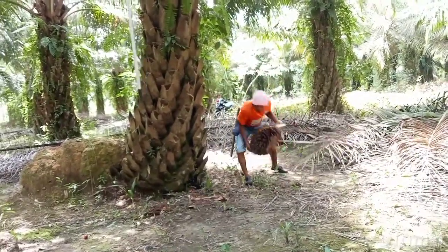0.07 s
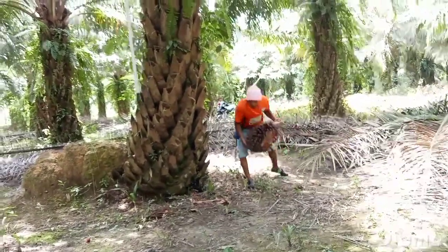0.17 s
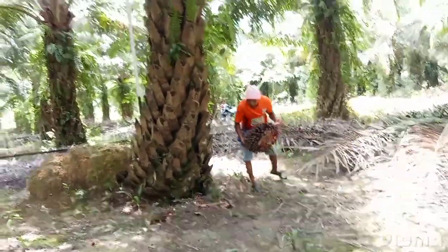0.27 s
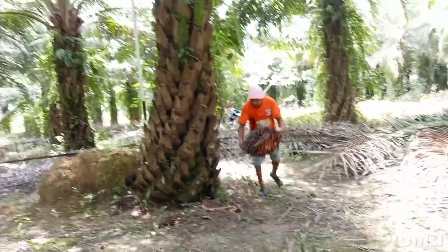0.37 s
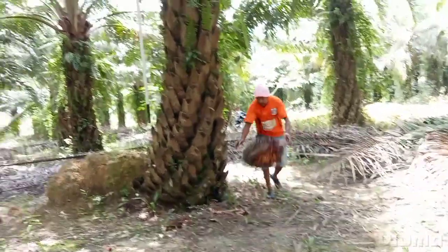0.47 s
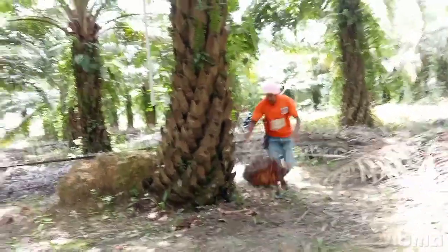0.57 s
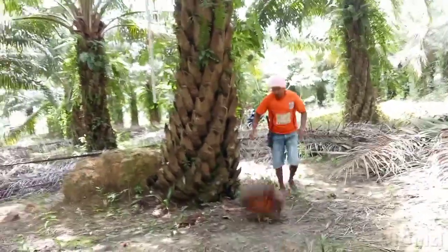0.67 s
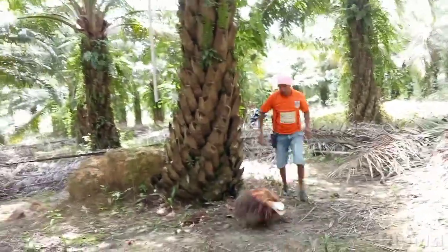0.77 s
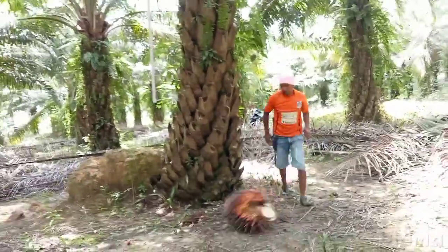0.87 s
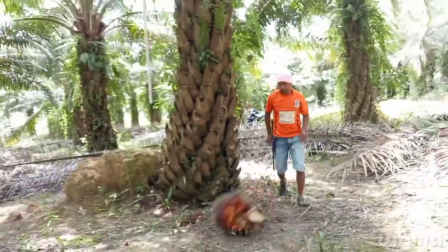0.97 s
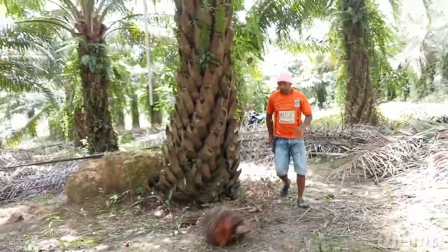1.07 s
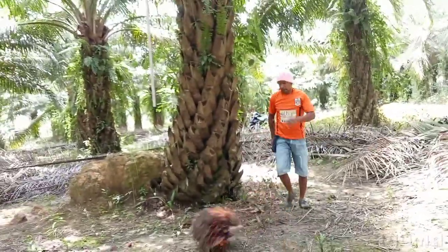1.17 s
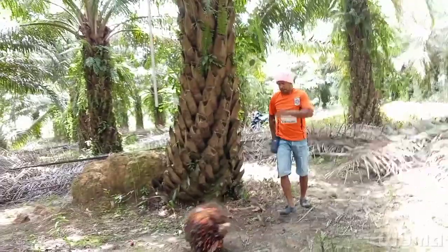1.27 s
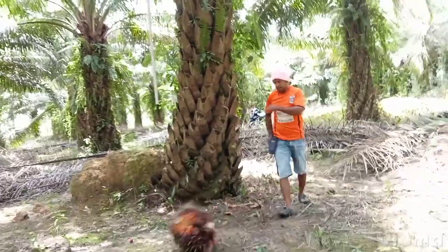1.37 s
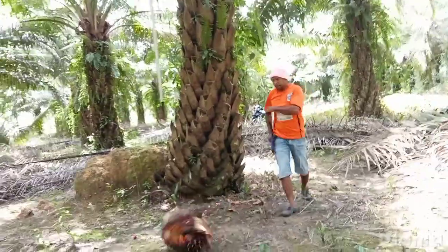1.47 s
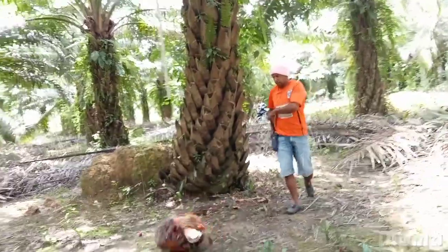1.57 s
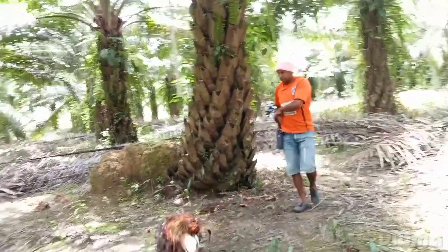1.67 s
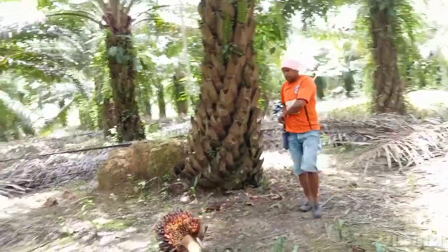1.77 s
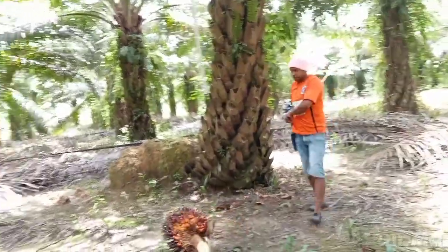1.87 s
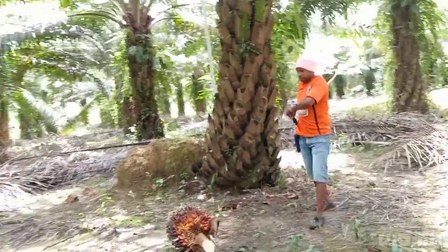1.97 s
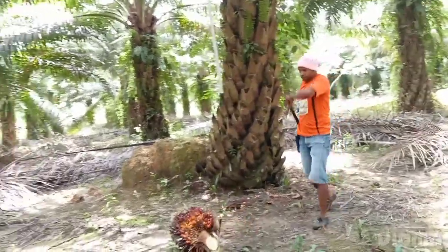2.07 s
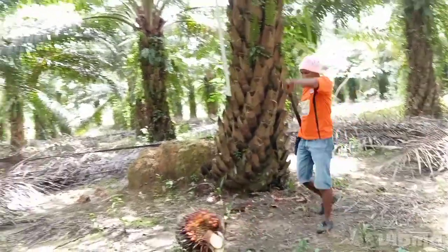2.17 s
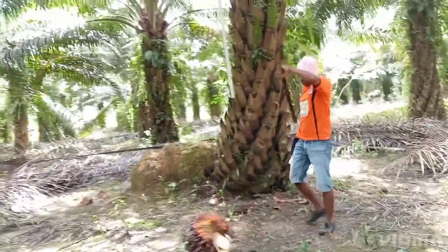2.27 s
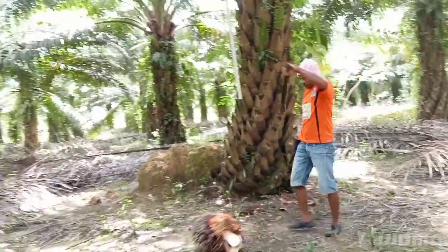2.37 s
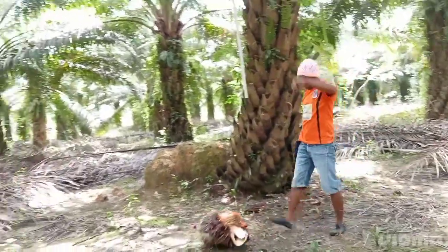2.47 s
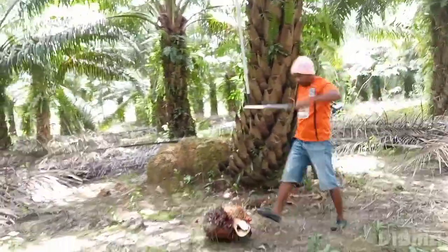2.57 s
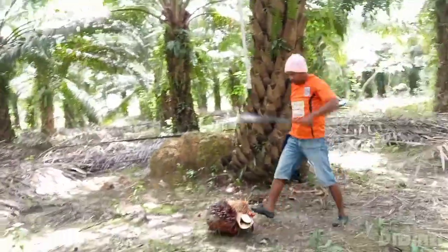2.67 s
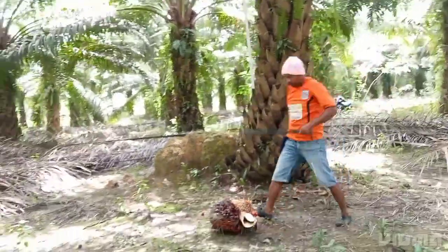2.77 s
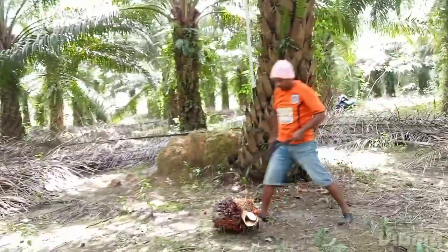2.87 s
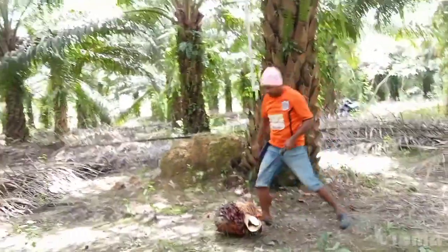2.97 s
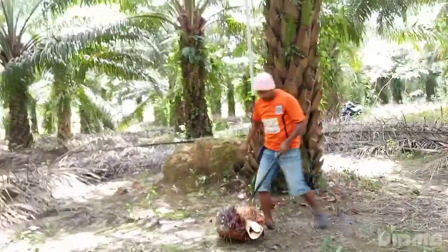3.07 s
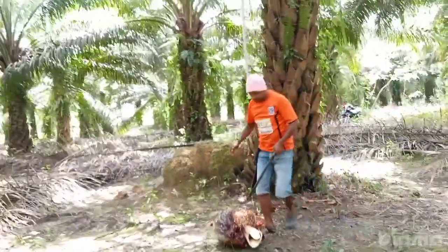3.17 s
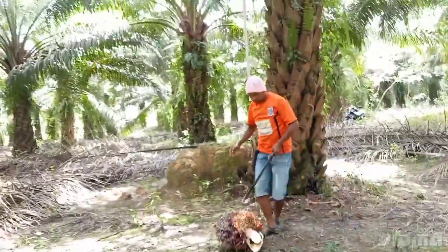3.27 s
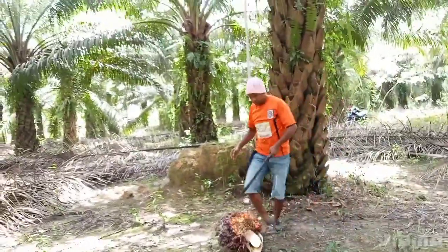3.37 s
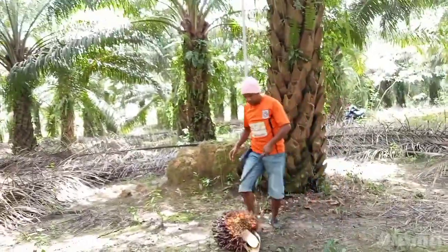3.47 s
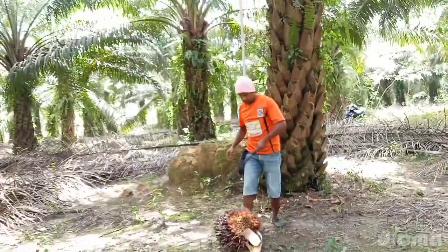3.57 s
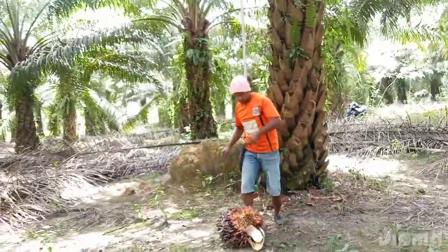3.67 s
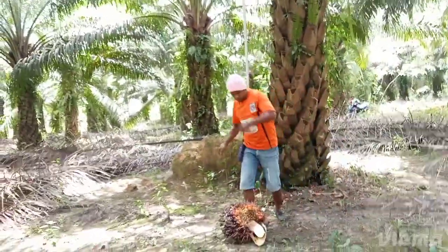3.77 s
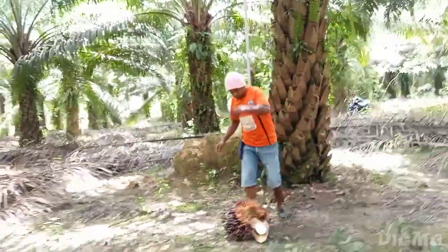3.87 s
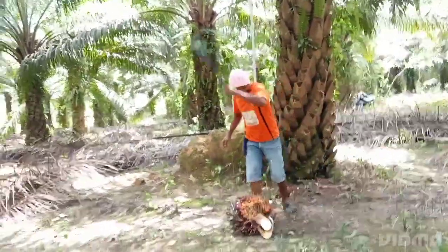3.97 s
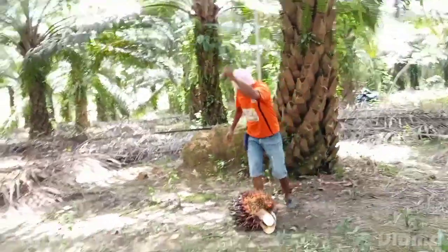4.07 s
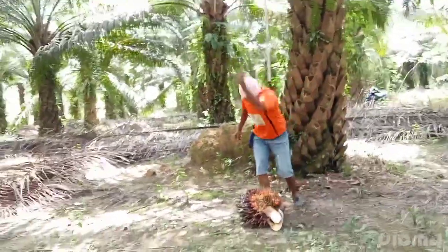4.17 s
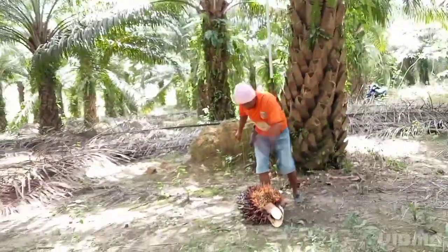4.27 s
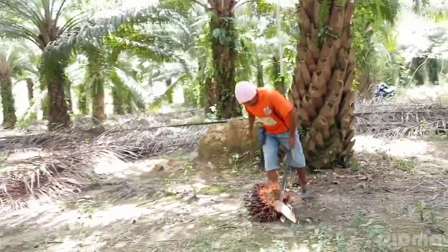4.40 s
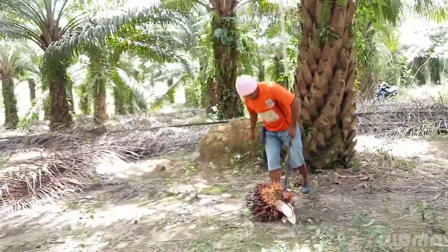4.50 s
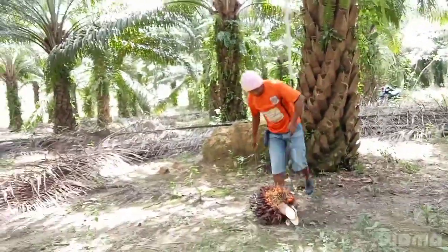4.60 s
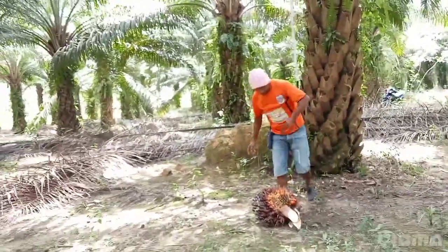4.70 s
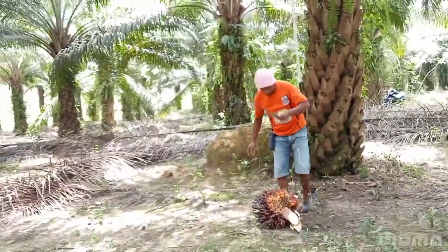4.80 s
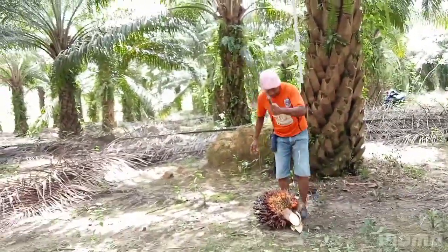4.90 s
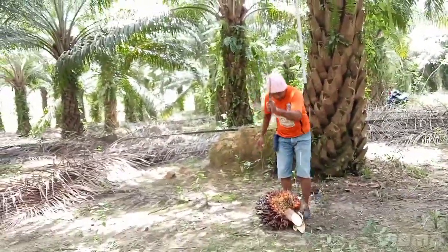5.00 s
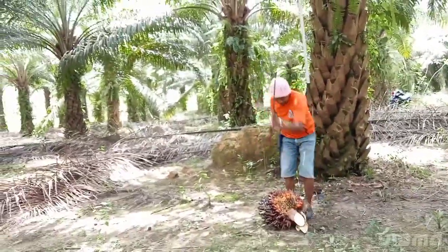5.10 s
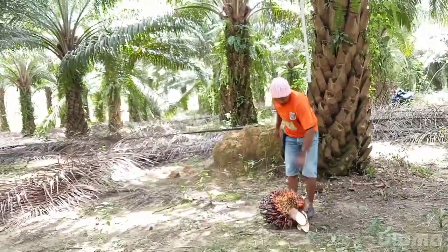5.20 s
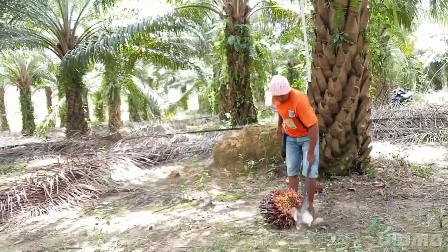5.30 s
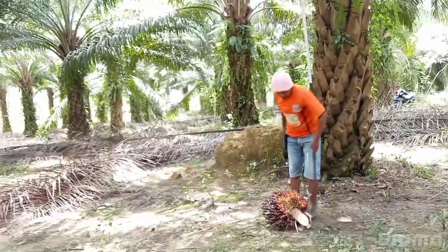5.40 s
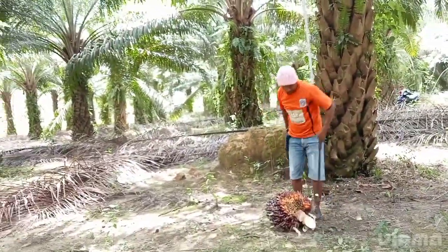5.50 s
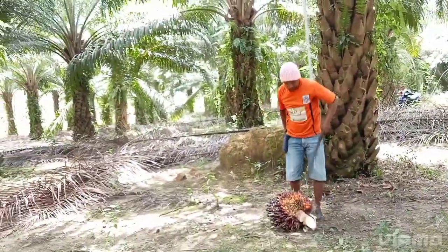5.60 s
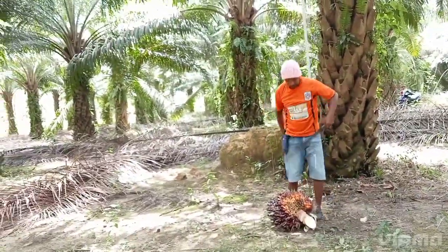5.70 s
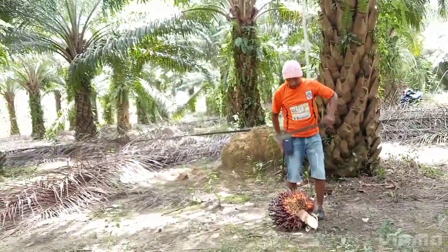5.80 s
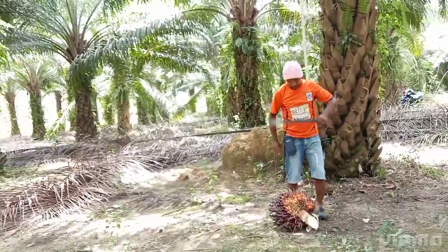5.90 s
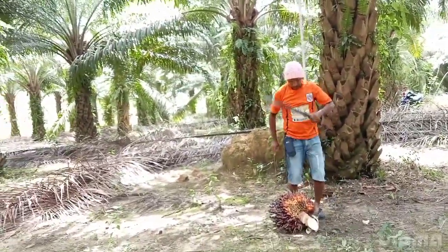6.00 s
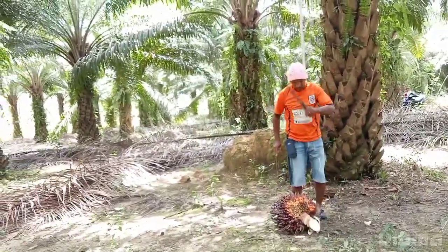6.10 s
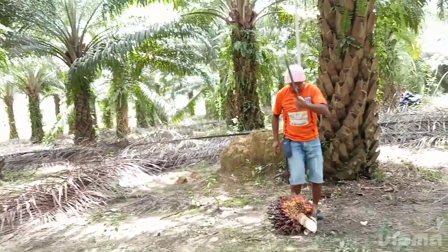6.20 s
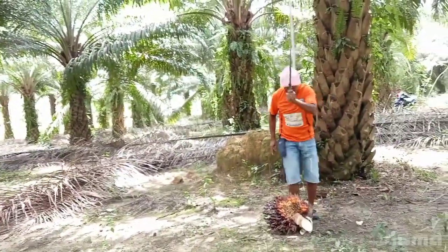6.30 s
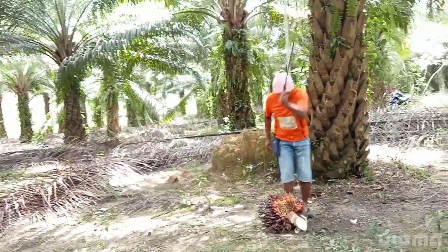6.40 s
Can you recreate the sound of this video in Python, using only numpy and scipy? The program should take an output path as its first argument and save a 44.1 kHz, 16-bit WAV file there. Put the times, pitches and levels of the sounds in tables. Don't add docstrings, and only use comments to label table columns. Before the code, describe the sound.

Outdoors among trunks, steady insect buzz, dry litter scuffs, a crunching thud, a blade scraping free, hard taps, then two sharp echoing chops.

```python
import sys
import numpy as np
from scipy import signal
from scipy.fft import rfft, irfft
from scipy.io import wavfile

SR = 44100
rng = np.random.default_rng(int(sys.argv[2]) if len(sys.argv) > 2 else 0)


def field_ratio(decibels):
    return 10 ** (np.asarray(decibels, dtype=float) / 20)


def dump(signal):
    limited = np.clip(np.atleast_2d(signal).T, -1, 1)
    pcm = np.round(limited * 32767).astype(np.int16)
    wavfile.write(sys.argv[1], SR, pcm)


N = 284427

# start in
# seconds, peak level in dB, pitch in Hz, 60 dB decay time in seconds.
BUMPS = [(1.028, -42.5, 620, 0.052), (1.238, -38, 601, 0.063), (1.28, -46.5, 638, 0.12),
         (1.353, -45.5, 558, 0.061), (1.499, -53, 610, 0.1), (1.57, -54, 590, 0.056),
         (1.724, -47.5, 542, 0.054), (1.879, -51.5, 576, 0.058), (2.02, -44, 644, 0.026),
         (2.335, -52, 637, 0.24), (2.393, -46, 744, 0.093), (3.028, -55.5, 619, 0.079),
         (3.301, -54, 686, 0.042), (3.337, -55, 630, 0.063), (3.384, -48.5, 637, 0.037),
         (3.476, -44.5, 614, 0.033), (3.707, -55, 783, 0.062), (4.328, -66, 583, 0.043),
         (4.38, -55.5, 764, 0.026), (4.471, -44, 610, 0.026), (4.49, -39, 250, 0.038),
         (4.626, -45.5, 294, 0.06), (5.045, -48, 570, 0.028), (5.07, -57, 770, 0.033),
         (5.4455, -20.5, 650, 0.033), (5.95, -62, 626, 0.056), (6.12, -52, 600, 0.026)]
CHOP_TIMES = [4.5084, 5.4270]


def rms_one(x):
    return x / np.sqrt(np.mean(x ** 2) + 1e-20)


def in_time(rows):
    seconds, *columns = np.transpose(rows)
    return [np.interp(np.arange(N) / SR, seconds, column) for column in columns]


def drift(rate):
    r = np.exp(-80 * np.pi * rate / SR)
    white = rng.standard_normal(N // 40 + 2002)
    slow = signal.lfilter([1], [1, -2 * r, r * r], white)[2000:]
    return np.interp(np.arange(N) / 40, np.arange(len(slow)), rms_one(slow))


def colour(x, spectrum):
    hz, db = np.transpose(spectrum)
    grid = np.linspace(1, SR / 2, 2049)
    cepstrum = irfft(np.log(field_ratio(np.interp(np.log(grid), np.log(hz), db))))
    cepstrum[1:2048] *= 2
    cepstrum[2049:] = 0
    response = irfft(np.exp(rfft(cepstrum)))
    return signal.oaconvolve(x, response / np.linalg.norm(response))[:len(x)]


def band(x, low_hz, high_hz):
    edges_hz = [low_hz, min(high_hz, .45 * SR)]
    return signal.sosfilt(signal.butter(2, edges_hz, "band", fs=SR, output="sos"), x)


def grains(per_s, spread_db):
    sizes = field_ratio(spread_db * np.minimum(rng.exponential(1, N), 4)) * rng.choice([-1, 1], N)
    return rms_one(sizes * (rng.random(N) < per_s / SR))


def add(out, s, sound):
    i = round(s * SR)
    out[i:i + len(sound)] += sound[:N - i]


def mode(hz, db, t60, soft_s):
    t = np.arange(int(1.4 * t60 * SR) + 2) / SR
    return field_ratio(db - 60 * t / t60) * (1 - np.exp(-t / soft_s)) * np.sin(2 * np.pi * hz * t)


def burst(length_s, tail_s, per_s):
    t = np.arange(int(.12 * SR)) / SR
    tearing = rng.standard_normal(len(t)) * (0.54 + (rng.random(len(t)) < per_s / SR))
    fade = np.exp(-np.maximum(t - length_s, 0) / tail_s)
    return rms_one(tearing) * fade * np.minimum(t / 0.0002, 1)


def swell(length_s):
    t = np.arange(int(3 * length_s * SR)) / SR / length_s
    return np.minimum(5 * t, 1) * np.exp(-t ** 2 * 2.74)


def chorus(song, body_hz, waver, level_db, per_s, share, click_s, depth_db):
    turn = np.cumsum(per_s * (1 + .001 * drift(1.5))) / SR
    click = np.exp(-(turn % 1) / per_s / click_s)
    throb = field_ratio(depth_db * np.cos(2 * np.pi * np.floor(turn) / 4 + .6))
    pitch = body_hz * (1 + waver * drift(120.0))
    body = np.cos(2 * np.pi * np.cumsum(pitch) / SR)
    soloist = rms_one(colour(click * throb * body, song))
    crowd = colour(rng.standard_normal(N) * field_ratio(0.73 * drift(8.2)), song)
    return field_ratio(level_db) * (np.sqrt(share) * soloist + np.sqrt(1 - share) * crowd)


def insects():
    # time in seconds, level of the low chorus in dB.
    loudness = [(0, -47.5), (1.52, -50), (2.8, -48), (4.3, -47), (5.4, -47), (6.45, -46.5)]
    # time in seconds, low clicks per second, low power share from 0 to 1,
    # high clicks per second, high power share from 0 to 1.
    soloists = [(0, 79, .08, 111, .1), (2.3, 79, .12, 111.3, .2), (3.8, 81.3, .25, 111.5, .4),
                (5, 77, .3, 111.7, .52), (6.45, 76, .3, 112.1, .5)]
    # frequency in Hz, density in dB per Hz.
    low_song = [(3290, -92), (5600, -70), (6310, -13), (6750, -5.5), (6870, 0), (7160, 6), (7660, 4.5),
                (8000, -2), (8260, -21), (8440, -19), (8880, -32), (9800, -44), (12700, -65), (21600, -120)]
    high_song = [(7060, -50), (12150, -62), (12750, -16), (13200, -11), (13850, -10), (14300, -2),
                 (14900, 1), (15500, 2), (16000, -27)]
    low_db, = in_time(loudness)
    low_per_s, low_share, high_per_s, high_share = in_time(soloists)
    high_db = low_db.mean() - 17 + 1.3 * (low_db - low_db.mean())
    low = chorus(low_song, 7170, .012, low_db, low_per_s, low_share, click_s=.004, depth_db=6.5)
    high = chorus(high_song, 14900, .03, high_db, high_per_s, high_share, click_s=.002, depth_db=3.5)
    return low + high


def overtone_puffs():
    pitch_hz, per_s, stops_s = 14150, 19.3, 1.9
    t = np.arange(N) / SR
    beat = np.maximum(np.sin(2 * np.pi * per_s * t), 0) * np.clip((stops_s - t) / .4, 0, 1)
    return field_ratio(-71) * beat * rms_one(band(rng.standard_normal(N), pitch_hz - 130, pitch_hz + 130))


def engine():
    # time in seconds, firings per second.
    speed = [(0, 15.22), (5.6, 15.2), (5.89, 14.8), (6.09, 14.5), (6.23, 14.0), (6.45, 13.4)]
    # time in seconds, low orders in dB, upper orders relative to low in dB,
    # highest orders relative to upper in dB.
    load = [(0, -60.5, -2, 1.3), (3, -63.5, 0, -1.5), (5.5, -63.5, 0, -4.5), (5.65, -59.5, -0.5, 0),
            (5.8, -56, -1, -10), (5.95, -56, -12, -1.5), (6.2, -59.5, -6.5, 1), (6.35, -56, -3, -8),
            (6.45, -58, -9, -8)]
    # multiple of the firing rate, level in dB.
    orders = [(1, -34), (2, -32), (3, -23), (4, -15), (5, 0), (6, -3), (7, -1), (8, -9), (9, -8), (10, -6),
              (11, -1), (12, -3), (13, -12), (14, -10), (15, -10), (16, -20), (17, -14), (18, -14),
              (19, -10), (20, -15), (21, -18), (22, -17), (23, -17), (24, -25)]
    arrival = [(5.5, .85), (6.5, 1.3), (8, 1.3), (10.5, .85), (12.5, .85), (14, 1.43), (16, 1.43),
               (18, 1.0)]
    # frequency in Hz, density in dB per Hz.
    rumble = [(30, -22), (55, -4), (100, 0), (180, -2), (300, -15), (450, -30)]
    per_s, = in_time(speed)
    low_db, upper_db, highest_db = in_time(load)
    turn = 2 * np.pi * np.cumsum(per_s) / SR
    out, lag = np.zeros(N), 0
    for k, db in orders:
        lag += 2 * np.pi * np.interp(k - .5, *np.transpose(arrival))
        tilt_db = upper_db * np.clip((k - 7) / 3, 0, 1) + highest_db * (k > 12)
        tilt_db -= 3.5 * (15.2 - per_s) * (k < 6)
        level = field_ratio(db + .8 * drift(2.5) + tilt_db)
        out -= level * np.cos(k * turn - lag + .2 * drift(1.5))
    return field_ratio(low_db) * out + field_ratio(-65) * colour(rng.standard_normal(N), rumble)


def air():
    # frequency in Hz, density in dB per Hz.
    air_spectrum = [(150, -59), (300, -18.5), (390, -19.5), (800, -21.5), (1580, -24), (2400, -20),
                    (3300, -18.5), (4000, -29.5), (4500, -46), (5000, -60), (5500, -50), (6000, -29.5),
                    (9000, -26.5), (10500, -41), (11700, -64)]
    return field_ratio(-64.5) * colour(rng.standard_normal(N) * field_ratio(0.27 * drift(10.3)), air_spectrum)


def litter():
    # time in seconds, level in dB.
    stir = [(0, -46), (.1, -65), (.3, -71), (.8, -62), (.95, -44.5), (1.08, -59), (1.42, -48),
            (1.57, -46.5), (1.68, -54.5), (2.1, -55.5), (2.35, -41), (2.47, -47), (2.66, -70), (3.4, -63.5),
            (3.7, -55.5), (3.9, -65), (4.5, -78.5), (6.45, -68.5)]
    # level in dB at a stir near -60 dB, share of its swing.
    husks_follow = (-67, 0.62)
    tips_follow = (-89, 1.0)
    # start in seconds, length in seconds, rustle in dB, dry crackle in dB.
    scuffs = [(0.01, 0.16, -61.5, -65), (0.21, 0.076, -65, -65), (0.578, 0.039, -57, -61),
              (0.617, 0.083, -52, -69), (1.017, 0.097, -55, -57), (1.227, 0.05, -51, -55),
              (1.279, 0.063, -55, -65), (1.475, 0.11, -56.5, -64), (1.811, 0.066, -68, -64),
              (1.864, 0.072, -60, -64), (2, 0.23, -56.5, -89), (2.188, 0.16, -79, -67),
              (2.29, .09, -82, -66), (2.345, .03, -80, -62), (2.39, .04, -78, -70),
              (2.877, 0.058, -59.5, -87), (3.022, 0.18, -62, -84), (3.347, 0.26, -60, -69),
              (3.454, 0.027, -48, -64), (3.476, 0.12, -64, -80), (3.673, 0.029, -44, -68),
              (3.696, 0.034, -60, -70), (4.435, 0.087, -54, -64), (5.01, 0.14, -64, -73)]
    # frequency in Hz, density in dB per Hz.
    frond_spectrum = [(760, -52), (1300, -8), (2020, -0.5), (2390, -1), (3600, 3), (5210, -31.5),
                      (6000, -12), (7800, -4), (13200, -120)]
    stir_db, = in_time(stir)
    rustle = field_ratio(stir_db - 9.5 + 2.3 * drift(25.0))
    rattle, crackle = (field_ratio(db - 7.5 + share * (stir_db + 59)) for db, share in (husks_follow, tips_follow))
    for s, length_s, rustle_db, crackle_db in scuffs:
        add(rustle, s, field_ratio(rustle_db) * swell(length_s))
        add(crackle, s, field_ratio(crackle_db) * swell(length_s))
    for s, db, *_ in BUMPS:
        add(rattle, s - .005, field_ratio(db - 17) * swell(0.067))
    for s in CHOP_TIMES:
        add(rustle, s + 0.11, field_ratio(-54.5) * swell(0.3))
    fronds = colour(grains(3000, 4.2), frond_spectrum)
    husks = rms_one(band(grains(1700, 0.56), 437, 1550))
    tips = rms_one(band(grains(3500, 4.0) * field_ratio(3 * drift(30.0)), 8000, 12500))
    return rustle * fronds + rattle * husks + crackle * tips


def snaps_and_taps():
    # start in seconds, peak in dB, pitch in Hz,
    # treble relative to peak in dB.
    snap_rows = [(0.22, -38.5, 3270, -16), (0.254, -46, 3150, -12), (0.579, -38.5, 3480, -2),
                 (1.0389, -44, 3300, -4), (1.4177, -49, 3450, -25), (1.4435, -50, 3020, 5),
                 (1.531, -41.5, 1320, -1), (1.545, -40, 1270, -18), (1.2426, -41, 1320, -13),
                 (1.236, -46, 1300, -12), (1.0253, -51, 1420, 2), (1.505, -50, 1720, -20),
                 (1.2842, -46, 1380, -20), (1.5436, -46, 2800, 11), (1.821, -50, 3480, 4),
                 (1.858, -41, 3330, -10), (2.0138, -41, 1360, -34), (2.219, -40, 1420, -29),
                 (2.274, -42.5, 1320, -23), (2.8747, -46, 3700, -27), (3.032, -45.5, 1110, -13),
                 (3.3925, -45, 3360, -19.5), (0.022, -49, 3970, -1), (0.0393, -50, 3940, -3),
                 (0.6096, -50, 3000, -14), (1.9847, -45, 3550, -16), (2.5167, -64, 3300, -16),
                 (2.901, -49, 3820, -14), (3.338, -58, 3180, -1), (3.608, -59, 3100, 1),
                 (5.191, -65, 2360, -20)]
    # start in seconds, peak in dB, pitch in Hz,
    # treble relative to peak in dB, second mode in Hz.
    tap_rows = [(1.2928, -25.5, 2350, -39.5, 2780), (3.4484, -22.5, 3270, -24, 2420),
                (3.459, -30.5, 2900, -5, 1980), (3.5025, -26, 3230, -26, 2660),
                (3.5145, -33, 2500, -28, 1850), (3.677, -20, 3670, -18, 2430),
                (3.677, -23.5, 1820, -28, 2600), (3.6936, -21, 3140, -22, 2200),
                (3.694, -32, 1790, -30, 1210), (3.7344, -47, 3330, -12, 2300),
                (3.8035, -40, 3300, -28, 2300), (3.8475, -46, 3250, -29, 2320),
                (4.079, -32.5, 3030, -30, 2220), (4.0795, -33.5, 1520, -30, 1390),
                (4.091, -37, 3220, -26, 2580), (4.0915, -35.5, 910, -30, 1000),
                (4.2108, -29.5, 1200, -30, 2120), (4.2115, -31, 3250, -38, 1650),
                (4.2175, -43, 3300, -30, 2500), (4.2888, -48, 3280, -41, 1490),
                (4.4474, -24, 3300, -28, 2650), (4.4478, -33, 2000, -30, 1310),
                (4.5055, -31, 3300, -9, 2600)]
    contacts = []
    for s, db, hz, treble_db in snap_rows:
        other_hz = hz * (1.65 if hz < 2000 else .68)
        contacts.append((s, db, hz, treble_db, other_hz, 0.013, 6300, 12500))
    for row in tap_rows:
        contacts.append((*row, 0.0044, 3500, 4900))
    bodies, bright = np.zeros(N), np.zeros(N)
    for s, db, hz, treble_db, other_hz, t60, low_hz, high_hz in contacts:
        edge = .6 * rng.standard_normal(200) * np.exp(-np.arange(200) / SR / .0009)
        edge[4] += 3.5
        body = band(edge, min(hz, other_hz) * .7, max(hz, other_hz) * 1.2)
        add(bodies, s + .0006, mode(hz, db, t60, .0002))
        add(bodies, s + .0006, -mode(other_hz, db - 2, .006, .0003))
        add(bodies, s + .0006, field_ratio(db - 5) * body)
        add(bright, s + .0006, field_ratio(db + treble_db + 3) * band(edge, low_hz, high_hz))
        add(bright, s + 0.00053, field_ratio(db + treble_db + 4.0) * band(edge, 6300, 9600))
    return bright + signal.sosfilt(signal.butter(6, 4000, fs=SR, output="sos"), bodies)


def bird():
    # start in seconds, length in seconds, start pitch in Hz, end pitch in Hz, level in dB.
    whistles = [(5.548, .152, 3420, 3390, -50), (5.945, .035, 2980, 3110, -59),
                (.44, .045, 3080, 3340, -65), (5.185, .06, 4790, 4770, -79), (6.17, .07, 3400, 3320, -65),
                (6.34, .08, 3280, 3330, -65), (5.82, .05, 3420, 3400, -65), (.68, .09, 3730, 3720, -68)]
    chirps = [(.05, .06, 3150, 3350, -63), (.12, .06, 3200, 3100, -65), (.27, .06, 3130, 3170, -65),
              (.36, .05, 3400, 3400, -66), (.49, .06, 3300, 3250, -65), (.6, .04, 3550, 3400, -64),
              (.77, .04, 3450, 3100, -65), (2.96, .07, 2300, 2300, -67), (3.03, .1, 3700, 3200, -63),
              (3.26, .05, 3100, 3080, -66), (3.52, .1, 3500, 3400, -61), (3.75, .05, 3250, 3200, -62),
              (3.82, .06, 2900, 2950, -61), (3.85, .05, 3200, 3350, -60), (3.9, .045, 2950, 2950, -63),
              (4.46, .045, 3400, 3100, -60), (4.92, .06, 3200, 3200, -65), (5.04, .055, 3150, 3300, -60),
              (5.375, .04, 3200, 3350, -66), (5.97, .07, 3350, 3250, -64), (6.03, .06, 2550, 2550, -66),
              (6.12, .08, 3000, 3050, -65)]
    out = np.zeros(N)
    for calls, waver_hz, flutter_db in ((whistles, 22, 1.2), (chirps, 110, 5.0)):
        waver, flutter = waver_hz * drift(90.0), field_ratio(flutter_db * drift(45.0))
        for s, length_s, start_hz, end_hz, db in calls:
            i, count = int(s * SR), int(length_s * SR)
            pitch = np.linspace(start_hz, end_hz, count) + waver[i:i + count]
            envelope = field_ratio(db) * np.hanning(count) ** .3 * flutter[i:i + count]
            add(out, s, envelope * np.sin(2 * np.pi * np.cumsum(pitch) / SR))
    return out


def landing():
    # start in seconds, crunch level in dB, crunch length in seconds.
    crunches = [
        (0.863, -42.5, 0.0066),
        (0.87, -36.5, 0.0057),
        (.886, -42, .005),
        (.907, -46, 0.0062),
        (.932, -51, 0.0045),
        (.95, -59, 0.024),
    ]
    # frequency in Hz, density in dB per Hz.
    crunch_spectrum = [(180, -49), (300, 1), (403, -14), (577, -6.5), (1330, -3), (2140, -7.5), (3330, 0),
                       (5180, -34), (7670, -10.5), (11700, -25.5), (15000, -13.5)]
    # mode frequency in Hz, level in dB, 60 dB decay time in seconds.
    ground_modes = [(63.6, 9.5, 0.072), (114, 9, 0.061), (169, 11.5, 0.044), (260, -3.5, 0.11),
                    (530, -9.5, 0.1), (645, 16, 0.016), (1300, 7, 0.022)]
    out = np.zeros(N)
    for s, db, length_s in crunches:
        add(out, s, field_ratio(db + 0.5) * colour(burst(length_s, 0.016, 2500), crunch_spectrum))
    for hz, db, t60 in ground_modes:
        add(out, crunches[1][0] + 0.00278, field_ratio(-29.5) * mode(hz, db, t60, 0.0036))
    return out


def thuds():
    # start
    # in seconds, peak level in dB, pitch in Hz, 60 dB decay time in seconds.
    ground_thuds = [(3.03, -55, 229, .08), (3.1, -58, 384, 0.075), (3.455, -48, 300, 0.045),
                    (3.47, -48, 890, 0.028), (3.53, -57, 230, .08), (3.705, -51.5, 286, 0.046),
                    (3.797, -57, 700, .02), (.965, -47, 94, .15), (1.04, -51, 110, 0.22), (3.36, -53, 604, 0.044),
                    (4.33, -55, 700, .012), (4.382, -52, 800, .012)]
    handle = [(3.46, -37, 1350, .012), (3.503, -42, 1400, 0.011), (4.091, -43, 910, .012),
              (4.2106, -36, 1045, .01), (4.448, -39, 850, .01)]
    out = np.zeros(N)
    for s, db, hz, t60 in [*BUMPS, *ground_thuds, *handle]:
        add(out, s, mode(hz, db, t60, 0.00091))
        add(out, s + 0.00195, mode(hz * 1.196, db - 9, t60 * 2.0, 0.0017))
    return out


def draw():
    # time in seconds, sliding level in dB.
    slide = [
        (2.0, -70),
        (2.02, -41.5),
        (2.144, -53),
        (2.214, -47),
        (2.222, -36),
        (2.242, -47.5),
        (2.402, -32.5),
        (2.5, -62),
    ]
    # resonance in Hz, bandwidth in Hz, level in dB.
    blade_modes = [(800, 28, -5), (1320, 130, -1), (1610, 32, 0.5), (2540, 60, 3), (3120, 21, 3),
                   (3315, 15, 5.5), (3700, 80, -40), (7100, 490, -11), (9280, 210, -27), (10100, 290, -32),
                   (10600, 300, -35), (10700, 270, -45), (11400, 190, -42), (12200, 84, -25)]
    level_db, = in_time([(slide[0][0] - .03, -90), *slide, (slide[-1][0] + 0.07, -90)])
    friction, ringing = grains(2500, 1.3), np.zeros(N)
    for hz, width_hz, db in blade_modes:
        r = np.exp(-np.pi * width_hz / SR)
        zeros = [(1 - r * r) / 2, 0, (r * r - 1) / 2]
        poles = [1, -2 * r * np.cos(2 * np.pi * hz / SR), r * r]
        grip = field_ratio(db + 3.2 * drift(14.0))
        ringing += grip * signal.lfilter(zeros, poles, friction)
    return field_ratio(level_db - 12.5) * rms_one(ringing)


def chops():
    # splitting level in dB, splitting length in seconds, knock level in dB,
    # knock delay in seconds, echo level in dB.
    blows = [
        (-16.5, 0.0067, -23.5, 0.0004, 4),
        (-18, 0.0064, -7.5, 0.0015, 5),
    ]
    # mode in Hz, level in dB, 60 dB decay time in seconds.
    stalks = [
        [(136, -8.5, 0.076), (290, -6, 0.16), (460, 3.5, 0.046), (580, 9.5, 0.024), (764, -16, 0.084), (1130, 3, 0.031), (3250, 14.5, 0.029)],
        [(141, -19.5, 0.0556), (297, -16.5, 0.13), (455, -13.5, 0.082), (619, 2.5, 0.035), (752, 1, 0.027), (875, 2, 0.017), (1130, -17, 0.028), (1453, -11.5, 0.029), (3400, 11.5, 0.013)],
    ]
    # frequency in Hz, density in dB per Hz.
    split_spectrum = [(530, -27), (900, -8), (1740, -9.5), (2660, -4), (3350, 0), (5180, -23.5),
                      (6220, -19), (7740, -3.5), (10900, -12), (11900, -14), (14800, -6.5), (15700, -22),
                      (16500, -50)]
    crack_spectrum = [(150, 4), (250, -2.5), (308, 0.5), (398, -5), (614, -5.5), (1010, -8), (1180, 0),
                      (2760, -0.5), (3450, -2.5), (5310, -25), (7380, -13), (11400, -28), (15500, -12)]
    out, crack = np.zeros(N), np.zeros(N)
    for s, (split_db, length_s, knock_db, delay_s, echo_db), stalk in zip(CHOP_TIMES, blows, stalks):
        add(out, s, field_ratio(split_db) * colour(burst(length_s, 0.0015, 6000), split_spectrum))
        crack[round(s * SR)] = field_ratio(echo_db + 10.0)
        for k, (hz, db, t60) in enumerate(stalk):
            knock = (-1) ** k * mode(hz, db + knock_db, t60, .002)
            add(out, s + delay_s * (hz < 2000), knock)
    return band(out, 100, 16300), colour(crack, crack_spectrum)


def grove(x):
    # band in Hz, level in dB, 60 dB decay time in seconds.
    decay_bands = [(250, -5, 0.16), (540, -14, 0.49), (1000, -9.5, 0.164), (1660, -10.5, 0.26),
                   (2800, -19, 0.57), (4450, -11.5, 0.61), (7070, -3.5, 0.46), (13800, -6, 0.17)]
    # frequency in Hz, width in Hz, level in dB,
    # 60 dB decay time in seconds.
    gaps = [(2007, 190, -15, 0.53), (2360, 150, -12.5, 0.48), (2698, 184, -7.5, 0.54),
            (3140, 270, -8.5, 0.53), (3450, 155, -10.5, 0.42)]
    # delay of a near trunk in seconds, level in dB, spread in seconds.
    trunks = [
        (.017, -23, .003),
        (0.037, -23.5, 0.0064),
        (.051, -20, .004),
        (.075, -27, 0.007),
    ]
    t = np.arange(int(.7 * SR)) / SR
    echo = np.zeros(len(t))
    for hz, db, t60 in decay_bands:
        lumps_db = (2.2 if 1500 < hz < 4000 else 1.1) * drift(30.0)[:len(t)]
        scattered = band(rng.standard_normal(len(t)), hz / 1.244, hz * 1.72)
        echo += field_ratio(db - 60 * t / t60 + lumps_db) * scattered
    for hz, width_hz, db, t60 in gaps:
        trapped = band(rng.standard_normal(len(t)), hz - width_hz / 2, hz + width_hz / 2)
        echo += field_ratio(db - 60 * t / t60) * trapped
    nearest = sum(field_ratio(db + 17.5) * np.exp(-((t - s) / spread_s) ** 2) for s, db, spread_s in trunks)
    echo *= (1 - np.exp(-(t / 0.013) ** 2) + nearest) * field_ratio(-30.5)
    return signal.oaconvolve(x, echo)[:N]


def scene():
    near = snaps_and_taps() + landing() + thuds()
    blows, crack = chops()
    background = insects() + overtone_puffs() + engine() + air() + bird()
    rest = background + near + litter() + draw() + grove(field_ratio(-3.0) * near + crack)
    rest = signal.sosfilt(signal.cheby2(20, 50, 15650, fs=SR, output="sos"), rest)
    blows = signal.sosfilt(signal.cheby2(8, 40, 16650, fs=SR, output="sos"), blows)
    return (blows + rest)[None]


def roll_off(x):
    return signal.sosfilt(signal.butter(12, 16610, fs=SR, output="sos"), x)


def record(dry):
    x = signal.sosfilt(signal.butter(4, 48, "high", fs=SR, output="sos"), dry)
    ahead_s, hold_s, release_s = 0.018, 0.204, 0.015
    since = np.arange(N) / SR - CHOP_TIMES[1]
    ducked = np.interp(since, [-ahead_s, -ahead_s / 2, hold_s, hold_s + release_s], [0, 1, 1, 0])
    handling = field_ratio(-89) * rms_one(band(rng.standard_normal(N), 12, 40))
    x = x * field_ratio(-3.5 * ducked) + handling
    rounded = 0.85 * np.tanh(x / 0.64)
    x = signal.sosfilt(signal.cheby2(12, 50, 16800, fs=SR, output="sos"), rounded)
    return roll_off(x)


dry = scene()
out = record(dry)
dump(out)
```